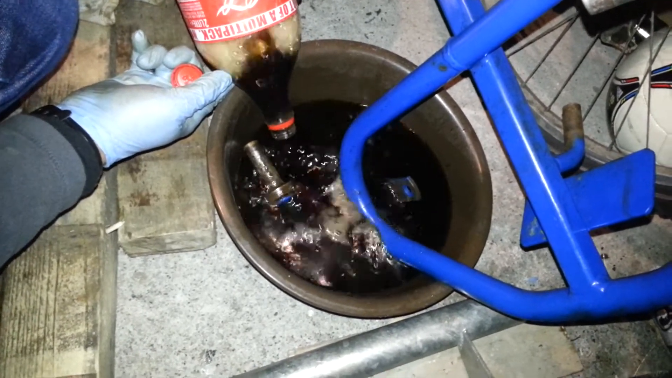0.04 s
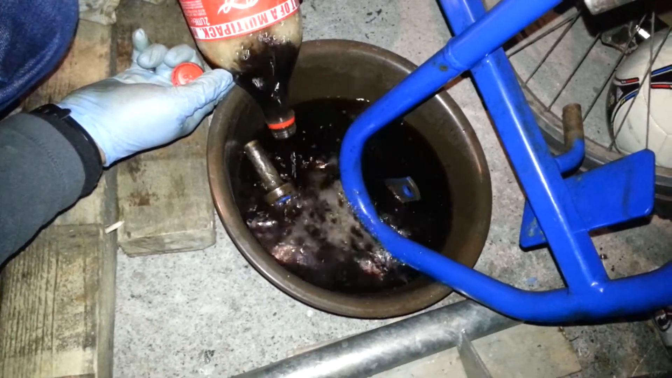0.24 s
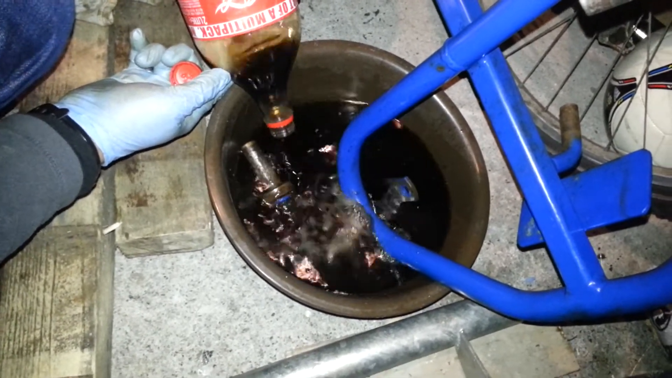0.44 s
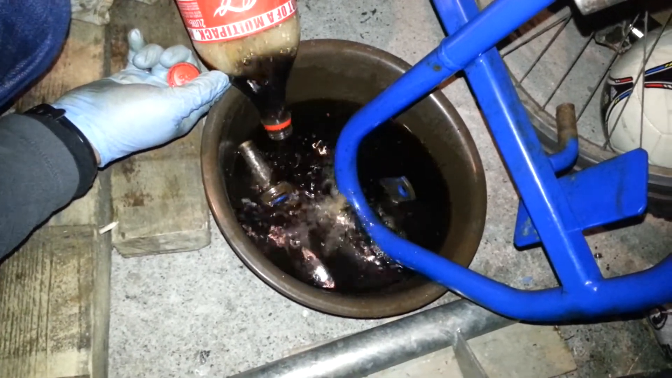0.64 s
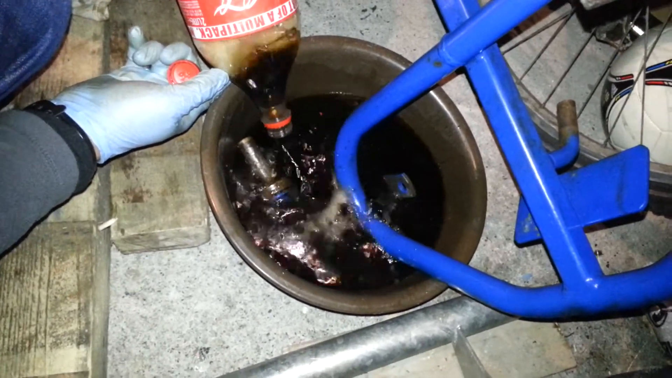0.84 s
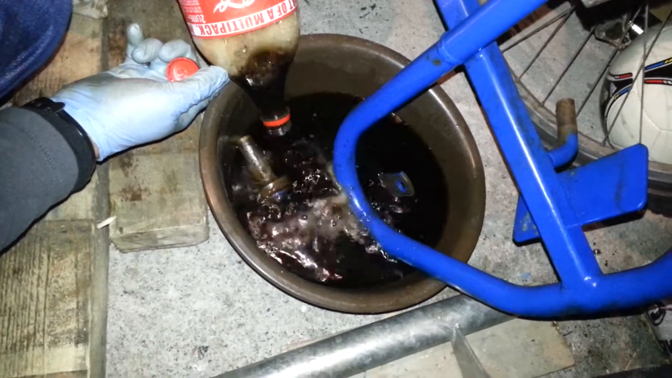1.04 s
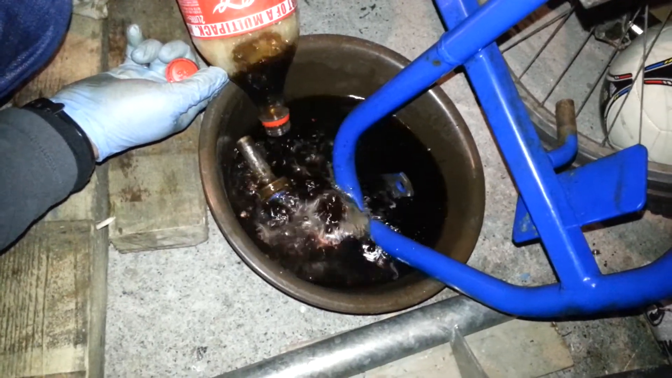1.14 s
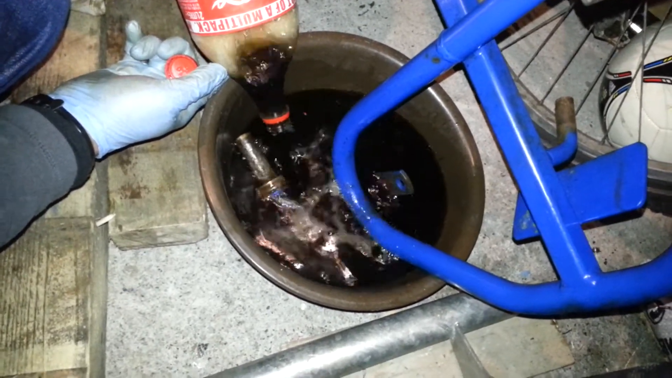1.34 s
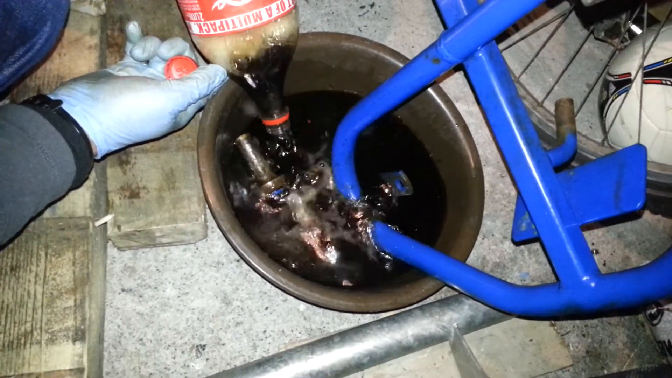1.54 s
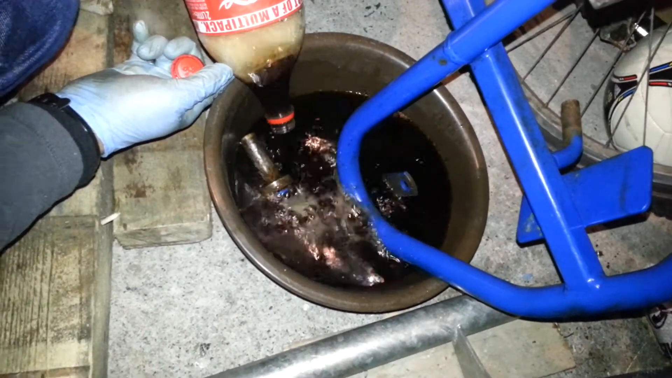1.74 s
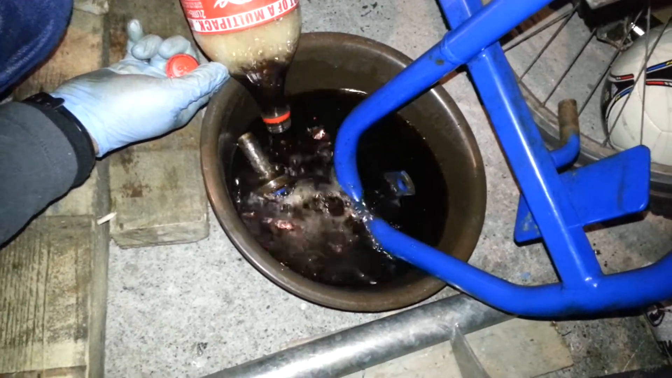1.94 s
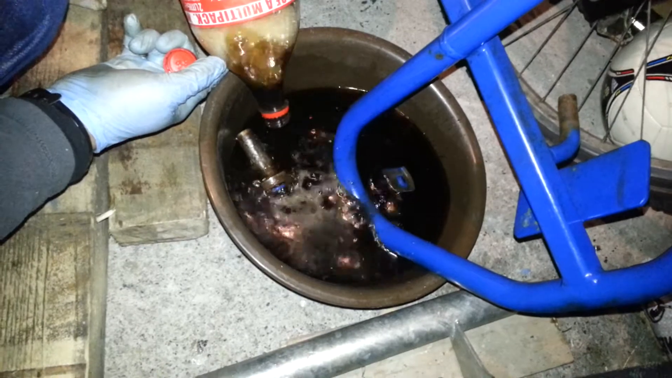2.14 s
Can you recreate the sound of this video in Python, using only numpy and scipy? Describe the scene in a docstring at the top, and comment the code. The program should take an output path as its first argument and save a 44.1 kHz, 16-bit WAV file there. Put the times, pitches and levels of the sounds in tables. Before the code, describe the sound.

Soda pouring from an upturned bottle into a tub, with uneven glugs and steady fizz.

```python
"""Fizzy liquid glugs out of a bottle into a bucket, outdoors, close to a two-port microphone.
From the start a bed of tiny bubbles fizzes over a distant rumble, and small bubbles plip and snap spray.
At 0.24 s the first large bubble pops low and sets the bucket ringing; more follow unevenly.
A soft gurgle slides down at 1 s and another up near 1.5 s. At 1.6 s the glugs crowd together
and the fizz swells with the pouring; a few more glugs close the scene."""
import sys
import numpy as np
from scipy import signal
from scipy.fft import rfft, irfft
from scipy.io import wavfile
from scipy.ndimage import uniform_filter1d

SR = 44100
rng = np.random.default_rng(int(sys.argv[2]) if len(sys.argv) > 2 else 0)


def unload_audio(sound):
    """Save the sound as a 16-bit wav file, at the path given as the first command line argument."""
    columns = np.transpose(np.atleast_2d(sound))
    # keep every value between -1 and 1, then stretch to whole-number steps
    steps = np.round(np.clip(columns, -1, 1) * 32767)
    wavfile.write(sys.argv[1], SR, steps.astype(np.int16))


N = 97020  # 2.2 s
SPLASH_ATTACK_S, RING_ROUGHNESS = .0017, .79


def amp(db):
    return 10 ** (np.asarray(db) / 20)


def unit_rms(x):
    return x / np.sqrt(np.mean(x ** 2) + 1e-20)


def over_frequency(points, hz):
    point_hz, value = np.transpose(points)
    return np.interp(np.log(hz + 1), np.log(point_hz + 1), value)


def over_time(points, column):
    columns = np.transpose(points)
    return np.interp(np.arange(N) / SR, columns[0], columns[column])


def add(mix, start_s, sound):
    part = mix[round(start_s * SR):][:len(sound)]
    part += sound[:len(part)]


def colour(x, spectrum):
    """Filters by a spectrum in dB."""
    return irfft(rfft(x) * amp(over_frequency(spectrum, np.fft.rfftfreq(N, 1 / SR))), N)


def wobble(samples):
    """A smooth random wander of rms 1 that changes within about this many samples."""
    return unit_rms(uniform_filter1d(uniform_filter1d(rng.standard_normal(N), samples), samples))


def rumble(hum_hz=259, hum_width_hz=62):
    """Distant low outdoor noise with a wavering, fuzzy tone in it."""
    # Each row: frequency in Hz, relative level in dB.
    spectrum = [(45, -34), (95, -7.5), (170, -12.5), (300, -21), (550, -6.5), (900, -14.5), (1500, -40)]
    # Each row: time in seconds, rumble level in dB, tone level in dB.
    levels = [(0, -50, -51), (.18, -54.5, -51.5), (.3, -51.5, -57), (.66, -57, -69), (.85, -46, -51.5),
              (1.12, -50.5, -49), (1.3, -55, -54.5), (1.45, -52, -61), (2.2, -55.5, -63.5)]
    low = unit_rms(colour(rng.standard_normal(N), spectrum))
    carrier = np.exp(2j * np.pi * hum_hz * np.arange(N) / SR)
    pole = np.exp(-np.pi * hum_width_hz / SR)
    waver = signal.lfilter([1], [1, -2 * pole, pole ** 2], rng.standard_normal(N) / carrier)
    hum = unit_rms((carrier * waver).real)
    return amp(over_time(levels, 1)) * low + amp(over_time(levels, 2)) * hum


def bubble(hz, t60, attack_s, rise):
    """One bubble rings as a dying sine whose pitch climbs."""
    t = np.arange(0, t60 + attack_s, 1 / SR)
    attack = np.sin(np.pi / 2 * np.minimum(t / attack_s, 1)) ** 2
    decay = amp(-60 * np.maximum(t - attack_s, 0) / t60)
    return attack * decay * np.sin(2 * np.pi * hz * (t + rise * t ** 2 / t60))


def bubble_swarm(per_s, spread_db, low_hz, high_hz, cycles, sizes):
    """Bubbles of many sizes ring at random, dying 20 dB in the given cycles; a few are loud."""
    strength = amp(spread_db * np.minimum(rng.exponential(1, N), 5))
    onsets = strength * (rng.random(N) < per_s / SR)
    size = rng.integers(0, sizes, N)
    swarm = np.zeros(N)
    for k, hz in enumerate(np.geomspace(low_hz, high_hz, sizes)):
        ring = bubble(hz, t60=3 * cycles / hz, attack_s=1.58 / hz, rise=.5)
        swarm += signal.oaconvolve(onsets * (size == k), ring)[:N] * np.sqrt(hz)
    return unit_rms(swarm)


def fizz(flicker_db, hiss_db=-43.5, hiss_follow=.54):
    """Thousands of tiny bubbles over their own blur, sparser gurgling, and a fine hiss on top."""
    # Each row: frequency in Hz, relative level in dB.
    spectrum = [(410, -68), (700, -8), (1400, -9), (2080, -7), (2490, -8), (3640, -5.5), (3980, -1),
                (14500, -8)]
    # The pour. Each row: time in seconds, fizz level in dB, gurgle level in dB.
    pour = [(.045, -39.5, -44.5), (.1, -45, -54.5), (.38, -41.5, -47.5), (.65, -43.5, -44.5),
            (.9, -39, -62), (1.1, -42.5, -74), (1.3, -43.5, -55), (1.48, -42, -51.5), (1.57, -40, -52),
            (1.605, -31.5, -41), (1.72, -41, -56), (1.9, -41, -45), (2.2, -45, -48.5)]
    tiny = bubble_swarm(per_s=2000, spread_db=2.5, low_hz=1410, high_hz=13600, cycles=2.84, sizes=24)
    bed = colour(rng.standard_normal(N) + amp(-5) * tiny, spectrum)
    body = colour(bed, [(6000, 0), (7500, -71)])
    level_db = over_time(pour, 1) + flicker_db
    gurgle = bubble_swarm(per_s=250, spread_db=3, low_hz=582, high_hz=4770, cycles=10.4, sizes=16)
    hiss = amp(hiss_db + hiss_follow * (level_db - np.median(level_db))) * unit_rms(bed - body)
    return amp(level_db) * unit_rms(body) + amp(over_time(pour, 2)) * gurgle + hiss


def plips(roughness=.55, spray_t60=.014):
    """Each small bubble rings roughly at its pitch and throws a snap of spray."""
    # Each row: start in seconds, level in dB, pitch in Hz, spray level in dB before its colouring.
    small_bubbles = [(0.0347, -32, 4150, -41.5), (0.047, -36, 2140, -47), (0.175, -30.5, 1480, -48),
                     (0.2365, -21.5, 2844, -46), (0.2948, -24.5, 4100, -46.5), (0.2945, -29, 2374, -47),
                     (0.39, -26, 2320, -55), (0.5042, -33.5, 1480, -45), (0.3883, -28.5, 3830, -51),
                     (0.3996, -25, 3970, -41.5), (0.508, -27.5, 5020, -63), (0.5415, -24, 2520, -60),
                     (0.567, -25.5, 1810, -63), (0.772, -56, 3650, -42), (0.8873, -27.5, 2170, -43),
                     (0.9263, -27.5, 1940, -62), (0.942, -29, 1970, -66), (0.9673, -24, 3770, -42),
                     (1.0636, -30, 3220, -52), (1.392, -29.5, 1950, -52), (1.403, -30.5, 2080, -44.5),
                     (1.565, -26, 2800, -59), (1.5934, -19, 4690, -38), (1.6, -19, 3620, -57),
                     (1.6235, -15.5, 2510, -46), (1.665, -25.5, 1900, -49), (1.677, -35, 4700, -47),
                     (1.7085, -21.5, 2320, -61), (1.8022, -32.5, 4170, -44), (1.856, -32, 1840, -34.5),
                     (1.909, -31.5, 1855, -51), (1.9299, -25, 3680, -40), (1.93, -22.5, 2650, -60)]
    # Each row: frequency in Hz, gain in dB.
    spray_spectrum = [(900, 8.5), (2500, 23.5), (4500, 23), (7000, 30.5), (15000, 16)]
    tones, snaps = np.zeros(N), np.zeros(N)
    t = np.arange(0, spray_t60, 1 / SR)
    for start_s, db, hz, spray_db in small_bubbles:
        add(tones, start_s, amp(db) * bubble(hz, t60=.029, attack_s=.0016, rise=.06))
        add(snaps, start_s, amp(spray_db - 60 * t / spray_t60) * np.minimum(t / SPLASH_ATTACK_S, 1))
    tones *= 1 + roughness * wobble(samples=20)
    return tones, colour(snaps * rng.standard_normal((2, N)), spray_spectrum)


def glugs(cycles=4.08, peak_share=.45, rise=.1, slap_t60=.068):
    """Each large bubble swells for a few cycles with a wet slap and knocks the bucket."""
    # Each row: start in seconds, peak in dB, pitch in Hz, then slap and knock in dB relative to the peak.
    large_bubbles = [(0.2381, -4.5, 555, -9, -16), (0.403, -16, 680, -2, -14.5), (0.541, -26, 570, -24, -6),
                     (0.567, -28.5, 646, -25, -36), (0.572, -21.5, 1046, 0.5, -28),
                     (0.741, -29, 1020, 7, -23), (0.889, -29.5, 710, 14, 0), (0.954, -21.5, 935, 3, -10),
                     (0.967, -17, 760, -0.5, -16), (0.979, -22.5, 509, -9, -8.5),
                     (1.312, -30.5, 477, -16, -8.5), (1.403, -24, 595, 5, -5.5),
                     (1.477, -32.5, 550, 0, -13), (1.564, -22.5, 598, -2, -4), (1.592, -20.5, 606, 3, -2.5),
                     (1.603, -21, 640, -17, -31), (1.612, -18, 542, 1.5, -33),
                     (1.624, -14.5, 517, -11.5, -12.5), (1.751, -20.5, 728, 2, -8),
                     (1.807, -25.5, 1047, 1, -21), (1.93, -13, 634, -2.5, -15.5),
                     (1.986, -33, 645, 5.5, -87), (2.084, -23.5, 610, 3.5, -8)]
    # Each row: frequency in Hz, gain in dB.
    slap_spectrum = [(220, -10.5), (480, 0.5), (1200, -2.5), (2500, -12), (5000, -19.5)]
    pops, knocks, slaps = np.zeros((3, N))
    t = np.arange(SR // 4) / SR
    for start_s, db, hz, slap_db, knock_db in large_bubbles:
        progress = np.arange(0, 1, hz / (SR * cycles))
        swell = np.sin(np.pi * progress ** (np.log(.5) / np.log(peak_share))) ** 2
        phase = 2 * np.pi * cycles * (progress - peak_share) * (1 + rise * progress)
        pop = amp(db) * swell * np.cos(phase)
        add(pops, start_s - .001, pop)
        add(knocks, start_s, amp(knock_db) * pop * 4 / len(pop))
        add(slaps, start_s, amp(db + slap_db - 60 * t / slap_t60) * np.minimum(t / SPLASH_ATTACK_S, 1))
    ring = bucket_ring(knocks)
    splash = colour(slaps * rng.standard_normal((2, N)), slap_spectrum)
    return pops + ring + splash[0] + .5 * splash[::-1]


def bucket_ring(knocks):
    """The bucket's modes ring roughly after each knock."""
    # Each row: frequency in Hz, gain in dB, seconds to die by 60 dB.
    modes = [(447.6, 3.5, 0.13), (555, -6.5, 0.18), (630.5, -8, 0.24), (860, -9.5, 0.38)]
    t = np.arange(SR // 4) / SR
    response = sum(amp(db - 60 * t / t60) * np.sin(2 * np.pi * hz * t) for hz, db, t60 in modes)
    return signal.oaconvolve(knocks, response)[:N] * (1 + RING_ROUGHNESS * wobble(samples=120))


def gliding_gurgles():
    """Soft rough tones that slide in pitch as an air pocket grows or shrinks."""
    # Each row: start in seconds, length in seconds, first pitch in Hz, last pitch in Hz, level in dB.
    glides = [(0.998, 0.042, 334, 270, -39.5), (1.461, 0.053, 743, 1390, -42)]
    tones = np.zeros(N)
    for start_s, length_s, from_hz, to_hz, db in glides:
        progress = np.arange(0, 1, 1 / (SR * length_s))
        phase = 2 * np.pi * np.cumsum(from_hz * (to_hz / from_hz) ** progress) / SR
        add(tones, start_s, amp(db) * np.sin(np.pi * progress) ** .5 * np.sin(phase))
    return tones * (1 + RING_ROUGHNESS * wobble(samples=120))


def reflections(x, shared, t60=.11):
    """Quick echoes inside the bucket and off the ground; shared weights those common to both ports."""
    t = np.arange(0, t60, 1 / SR)
    taps = rng.standard_normal((3, len(t))) * amp(-60 * t / t60) * (t > .004)
    taps = shared * taps[0] + (1 - shared) * taps[1:]
    return signal.oaconvolve(x[None], taps / np.linalg.norm(taps[0]), axes=1)[:, :N]


def scene():
    """Close bubbles in the centre, with their reflections, over a wide bed of fizz and rumble."""
    # Each row: frequency in Hz, left-right likeness of the bed from 0 to 1.
    bed_likeness = [(60, 0.94), (500, 0.47), (1500, 0.077), (3500, 0.48), (15000, 0.028)]
    flicker_db = 1.5 * wobble(samples=500)
    left, unrelated = fizz(flicker_db) + rumble(), fizz(flicker_db) + rumble()
    likeness = over_frequency(bed_likeness, np.fft.rfftfreq(N, 1 / SR))
    right = irfft(likeness * rfft(left) + np.sqrt(1 - likeness ** 2) * rfft(unrelated), N)
    low_bubbles = glugs() + gliding_gurgles()
    high_bubbles, spray = plips()
    echoes = reflections(amp(-11) * low_bubbles[0], shared=.42)
    echoes += reflections(amp(-11) * high_bubbles + amp(-12) * spray[0], shared=0)
    return np.array([left, right]) + low_bubbles + high_bubbles + spray + .5 * spray[::-1] + echoes


def record(dry, left_lag_s=.00006, low_cut_hz=81, high_cut_hz=14600):
    """A band-limited two-port microphone: the left port hears a little later, with louder treble."""
    # Each row: frequency in Hz, left minus right in dB.
    balance = [(400, -0.5), (1300, 3.5), (4400, 5.5), (8100, 0.5), (15000, 6)]
    hz = np.fft.rfftfreq(N, 1 / SR)
    lean = amp(over_frequency(balance, hz) / 2) * np.exp(-1j * np.pi * hz * left_lag_s)
    low_cut = 1 / np.sqrt(1 + (low_cut_hz / (hz + 1)) ** 4)
    ports = irfft(rfft(dry) * np.array([lean, 1 / lean]) * low_cut, N)
    high_cut = signal.firwin(511, high_cut_hz, window=("kaiser", 9), fs=SR)
    return signal.oaconvolve(ports, high_cut[None], "same")


dry = scene()
out = record(dry)
unload_audio(out)
```